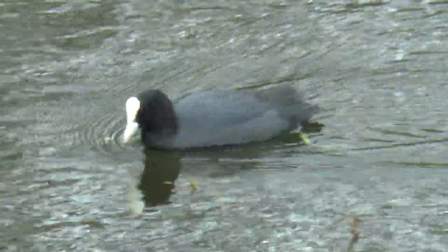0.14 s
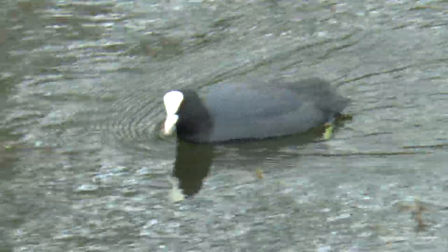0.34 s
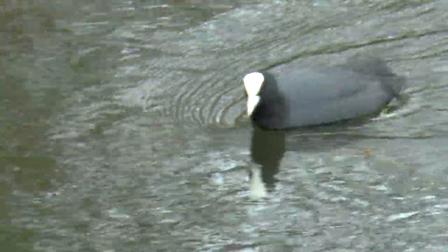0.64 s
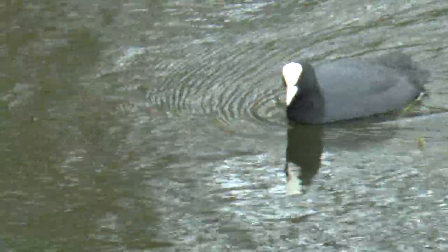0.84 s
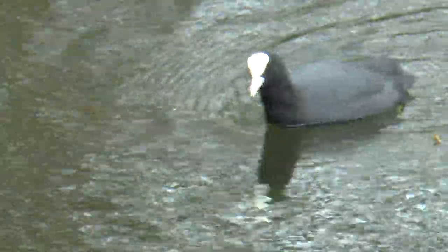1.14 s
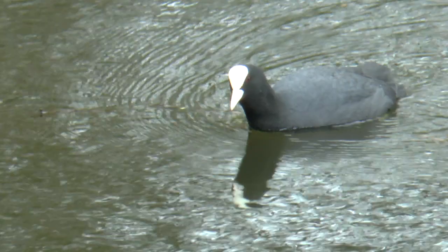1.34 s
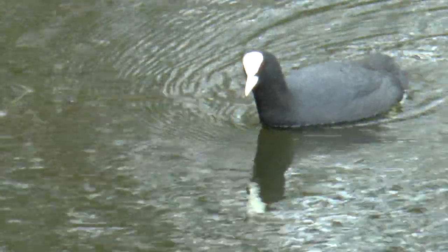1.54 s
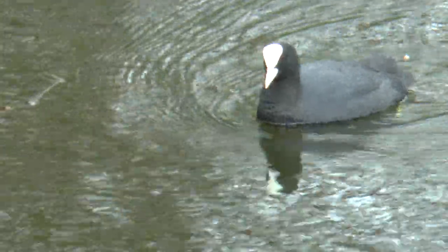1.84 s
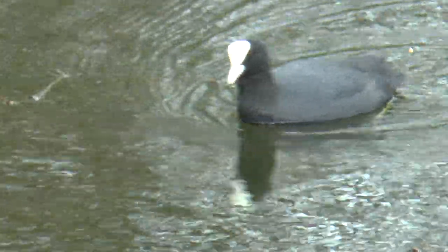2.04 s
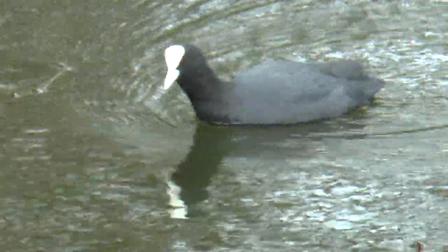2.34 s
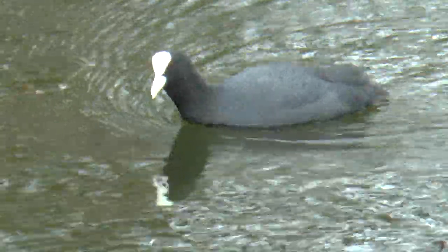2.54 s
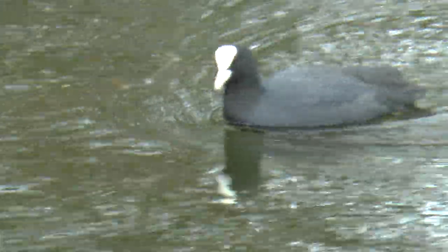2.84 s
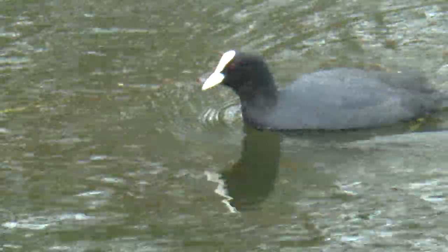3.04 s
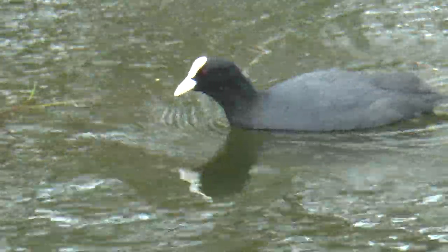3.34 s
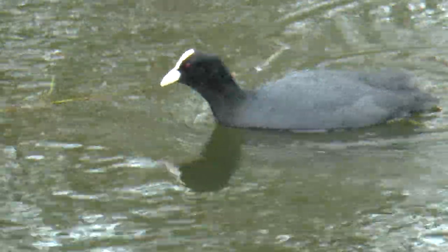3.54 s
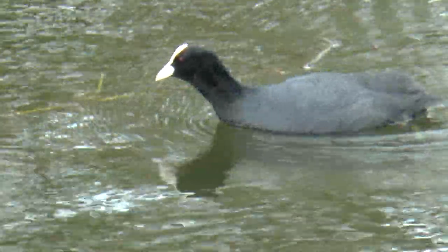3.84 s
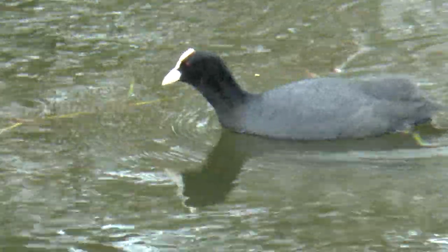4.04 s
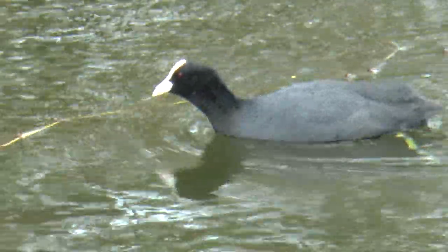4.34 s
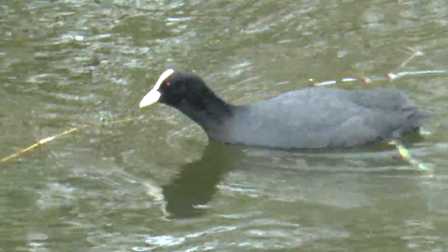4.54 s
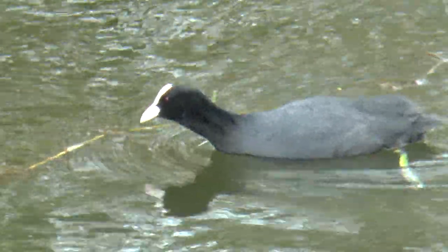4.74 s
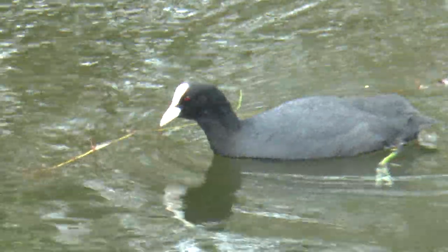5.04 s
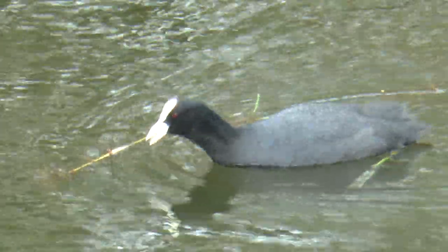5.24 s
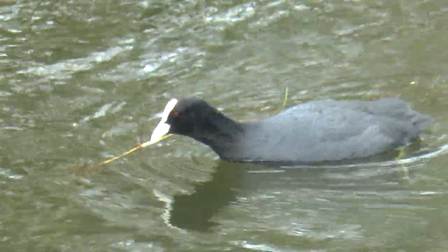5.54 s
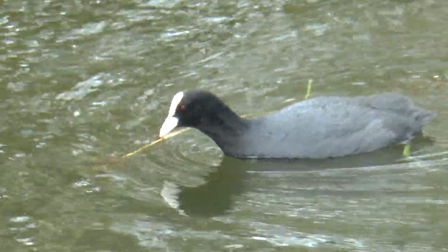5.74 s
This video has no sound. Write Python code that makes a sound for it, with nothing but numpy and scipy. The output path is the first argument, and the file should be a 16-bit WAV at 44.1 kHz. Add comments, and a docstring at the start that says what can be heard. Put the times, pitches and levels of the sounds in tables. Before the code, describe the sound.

Wind buffets the microphone beside a lake as a waterbird repeats brief, clear notes with a light echo.

```python
"""A string of short coot notes on a lake, most kicking up in pitch, all slurring down; the banks echo them.
Each is a nearly pure syrinx tone whose overtones fade first as the pressure drops.
Wind eddies rumble and buffet on the microphone over a low drone, a distant wash and a fine hiss.
Something rustles briefly, a far bird chips twice and tiny splashes tick now and then."""
import sys
import numpy as np
from scipy import signal
from scipy.fft import rfft, irfft
from scipy.io import wavfile
from scipy.ndimage import uniform_filter1d

SR = 44100
rng = np.random.default_rng(int(sys.argv[2]) if len(sys.argv) > 2 else 0)


def materialize(psi):
    """Save the field psi as 16-bit PCM at rate SR to the path in sys.argv[1].

    A 1-D psi becomes a single channel; in a 2-D psi each row is a channel.
    """
    bounded = np.clip(np.atleast_2d(psi).T, -1, 1)
    quanta = np.round(bounded * 32767).astype(np.int16)
    wavfile.write(sys.argv[1], SR, quanta)


N = 259749
TIME = np.arange(N) / SR


def coot():
    """Notes heard straight across the water and back from the banks."""
    # t/s, length/s, start f/Hz, top f/Hz, level/dB, bite near 4 kHz/dB, treble/dB,
    # bill resonance f/Hz, send to banks/dB
    notes = [(-.045, 0.0597, 1336, 1350, -31, 4.5, -7, 8000, 0.5),
             (.538, 0.0818, 1372, 1438, -22.5, 1, -11.5, 8500, -0.5),
             (1.387, 0.0868, 1281, 1336, -22, 0.5, 0, 8020, -0.5),
             (2.622, 0.0756, 1312, 1370, -20, 1.5, 3, 10160, -0.5),
             (3.094, 0.0505, 1310, 1298, -24, -11.5, -16, 7900, 0),
             (3.565, 0.0799, 1335, 1364, -23, -4.5, 0.5, 7940, 2),
             (4.295, 0.0985, 1368, 1370, -17.5, .5, 2.5, 8720, 0.5),
             (5.325, 0.11, 1368, 1369, -17, .5, 3.5, 11380, 0)]
    direct, sent = np.zeros((2, N))
    for start_s, *settings, send_db in notes:
        note = coot_note(*settings)
        add(direct, start_s, note)
        add(sent, start_s, gain_of(send_db) * note)
    return direct + lake_echo(sent)


def coot_note(length_s, start_hz, top_hz, level_db, bite_db, treble_db, bill_hz):
    """Nearly pure syrinx tone, coloured by the throat; the open bill picks out high overtones."""
    # throat response: f/Hz, level/dB
    throat = [(1400, 1.5), (2650, -13.5), (4000, -20.5), (5300, -37), (6700, -47), (8000, -47.5),
              (9400, -45.5), (10900, -49.5), (12300, -49), (15000, -54.5)]
    brightness = [(2700, 0), (4000, bite_db), (5500, bite_db), (8000, treble_db)]
    attack_s, top_s = 0.01425, 0.01598
    fade_db, dulling_db, flutter_db, shimmer_db = 2, 4.5, 0.682, 0.14
    bill_db, bill_width_hz = 10, 1200
    # harder notes slur further and release more slowly
    effort_db = level_db + 23
    end_hz = top_hz * (1 - 0.07687 - 0.0058 * effort_db)
    release_s = length_s * max(0.443 + 0.0517 * effort_db, 0.1)
    t = np.arange(0, length_s, 1 / SR)
    rise = np.clip(t / top_s, 0, 1)
    fall = np.clip((t - top_s) / (length_s - top_s), 0, 1)
    hz = start_hz + (top_hz - start_hz) * rise ** 3 + (end_hz - top_hz) * fall ** 0.743
    jitter = 1 + 0.00615 * waver(326, len(t))
    phase = 2 * np.pi * np.cumsum(hz * jitter) / SR
    onset = np.sin(np.pi / 2 * np.clip(t / attack_s, 0, 1))
    pressure = np.sin(np.pi / 2 * np.clip((length_s - t) / release_s, 0, 1))
    rasp = noise([(800, -31)] + throat[1:])[:len(t)]
    voice = gain_of(-42) * pressure * rasp
    for k in range(1, 12):
        # higher overtones: less steady, later in, sooner out
        unsteady_db = (k - 1) * (flutter_db * waver(120, len(t)) - dulling_db * fall ** 1.37)
        envelope = onset ** (0.2 * (k - 1)) * pressure ** np.sqrt(k)
        ring_db = bill_db * np.exp(-((k * hz - bill_hz) / bill_width_hz) ** 2)
        partial_db = at_hz(throat, k * hz) + at_hz(brightness, k * hz) + ring_db + unsteady_db
        voice += gain_of(partial_db) * envelope * np.sqrt(2) * np.cos(k * phase)
    contour_db = level_db - fade_db * fall + shimmer_db * waver(150, len(t))
    return voice * onset ** 0.99 * gain_of(contour_db)


def lake_echo(dry, tail_db=-16, build_s=0.019, near_db=6, near_s=0.029, taps_per_s=2000):
    """A few clear reflections and a scattered tail, strongest at first from the near bank."""
    # first reflections off water and banks: delay/s, level/dB
    echoes = [(.038, -20), (.058, -25.5), (.095, -24.5), (.123, -28)]
    # decay of the banks' ring: f/Hz, t60/s
    bank_t60 = [(1300, 0.674), (2700, 0.46), (4000, 0.47), (8000, .28), (14000, .15)]
    # scattered spectrum: f/Hz, level/dB
    scatter = [(1300, -1.5), (2700, 3.5), (4000, 10), (5500, 12.5), (8500, 14.5), (12000, -6.5)]
    t = np.arange(SR) / SR
    swell = (1 - np.exp(-t / build_s)) * gain_of(near_db * np.exp(-(t / near_s) ** 2))
    taps = rng.choice([-1., 1.], SR) * (rng.random(SR) < taps_per_s / SR) * swell
    hz, frame_s, frames = signal.stft(taps, SR, nperseg=256)
    decay_db = 60 * frame_s / at_hz(bank_t60, hz)[:, None]
    frames = frames * gain_of(at_hz(scatter, hz)[:, None] - decay_db)
    tail = signal.istft(frames, SR, nperseg=256)[1][:SR]
    voice_band = abs(rfft(tail))[1200:1450]  # 1 Hz bins around the coot's pitch
    response = gain_of(tail_db) * tail / np.sqrt(np.mean(voice_band ** 2))
    for delay_s, echo_db in echoes:
        add(response, delay_s, gain_of([echo_db]))
    return signal.fftconvolve(dry, response)[:N]


def wind(trim_db=0.5, churn_db=1.6, churn_hz=9, buffet_s=0.0307, tilt_db_per_oct=1.0, pivot_hz=36):
    """Eddies at the microphone: rumble rides the gusts; a buffet is a short push of faster eddies."""
    # gust strength: t/s, level/dB
    gusts = [(.02, -12.5), (.45, -14.5), (.7, -25), (.84, -13.5), (1.27, -15.5), (1.6, -22.5), (1.92, -17),
             (2.17, -24.5), (2.8, -19), (3.02, -23), (3.55, -13.5), (3.73, -20.5), (4.4, -20.5),
             (4.66, -15.5), (4.88, -27), (5.25, -22), (5.4, -25.5), (5.78, -14)]
    # thumps on the microphone: peak t/s, level/dB
    buffets = [(1.725, -12), (2.05, -12.5), (2.265, -15), (2.49, -14), (2.66, -13.5), (3.325, -12.5),
               (4.65, -15.5), (4.97, -17)]
    # rumble spectrum: f/Hz, density/dB
    slow = [(3, -16), (10, -1), (22, -1), (36, 3), (60, -6), (95, -12), (125, -21.5), (170, -27),
            (250, -38.5), (500, -53.5), (1500, -90.5)]
    fast = [(hz, db + tilt_db_per_oct * np.log2(hz / pivot_hz)) for hz, db in slow]
    gust_db, = over_time(gusts)
    pushes = sum(gain_of(db) * np.exp(-((TIME - peak_s) / buffet_s) ** 2) for peak_s, db in buffets)
    rumble = eddies(slow) * gain_of(gust_db + trim_db + churn_db * waver(churn_hz))
    return rumble + eddies(fast) * pushes


def eddies(spectrum, steadiness=0.72):
    """Turbulent noise, its own level swings partly evened out."""
    flow = noise(spectrum)
    power = uniform_filter1d(flow ** 2, size=2600)
    return unit_rms(flow / power ** (steadiness / 2))


def far_bird(send_db=6):
    """Short, rough, falling chips, heard mostly by way of the banks."""
    # t/s, length/s, start f/Hz, end f/Hz, level/dB, pitch roughness/fraction
    chips = [(2.154, 0.0448, 2590, 2405, -43, 0.04), (5.195, 0.039, 2840, 2140, -44.5, 0.07),
             (5.222, 0.031, 2658, 2106, -46, 0.1)]
    direct = np.zeros(N)
    for start_s, length_s, start_hz, end_hz, level_db, roughness in chips:
        size = round(length_s * SR)
        hz = np.linspace(start_hz, end_hz, size) * (1 + roughness * waver(850, size))
        tone = 2 * np.sin(2 * np.pi * np.cumsum(hz) / SR)
        add(direct, start_s, gain_of(level_db) * np.hanning(size) * tone)
    return direct + gain_of(send_db) * lake_echo(direct)


def water_ticks(skirt_db=-28):
    """Tiny splashes: puffs of bright noise that die at once."""
    # t/s, level/dB, centre f/Hz, t60/s
    splashes = [(2.144, -59, 9000, 0.1), (2.313, -52, 13100, 0.094), (2.439, -50, 7000, 0.039),
                (3.456, -52.5, 7950, 0.036), (4.505, -58, 13100, .043), (4.537, -58, 13000, .05),
                (5.104, -44.5, 5800, 0.0244), (5.760, -48, 7030, 0.01)]
    ticks = np.zeros(N)
    for start_s, level_db, hz, t60_s in splashes:
        t = np.arange(0, t60_s, 1 / SR)
        puff = noise([(hz / 4, skirt_db), (hz, 0), (hz * 4, skirt_db)])[:len(t)]
        add(ticks, start_s, gain_of(level_db - 60 * t / t60_s) * puff)
    return ticks


def rustle(peak_s=0.784, half_length_s=0.072, level_db=-52):
    """One soft swell of bright noise."""
    # f/Hz, density/dB
    spectrum = [(1000, -14), (2700, -8), (3700, 0.5), (4600, -13.5), (9000, -28.5)]
    swell = np.exp(-((TIME - peak_s) / half_length_s) ** 2)
    return noise(spectrum) * gain_of(level_db) * swell


def surroundings(throb_db=2, throb_hz=6, flicker_db=2.28, flicker_hz=40):
    """Throbbing low drone, dull distant wash and fine, flickering hiss."""
    # t/s, drone level/dB
    drone_levels = [(.05, -37.5), (.6, -41), (1.6, -40.5), (2.5, -31), (2.75, -39.5), (3.05, -35.5),
                    (3.7, -39.5), (5.85, -37.5)]
    # t/s, wash level/dB, hiss level/dB
    air_levels = [(0.06, -44, -64.5), (0.14, -47.5, -67), (0.52, -46, -64), (0.73, -40, -58.5),
                  (0.91, -42.5, -62.5), (0.93, -48, -65.5), (1.12, -49.5, -65), (1.25, -43, -62),
                  (1.31, -47.5, -62), (1.65, -39, -56.5), (2.45, -38, -60), (2.63, -38, -58.5),
                  (2.7, -42.5, -62), (3.05, -37.5, -60.5), (3.64, -42.5, -63), (3.74, -40.5, -65),
                  (4.16, -40, -60), (4.83, -41, -63), (5.54, -40.5, -60.5), (5.83, -42, -65)]
    # spectra: f/Hz, density/dB
    drone_spectrum = [(60, -10), (120, -0.5), (170, -1), (240, 0.5), (350, -10.5), (600, -24.5),
                      (1500, -52.5)]
    wash_spectrum = [(60, -13.5), (200, -0.5), (400, 4.5), (700, 0), (1150, -1.5), (1600, -9.5),
                     (2100, -13.5), (2900, -16), (3600, -13.5), (4500, -23.5), (7000, -31.5), (15000, -44)]
    hiss_spectrum = [(1500, -11), (4500, 3.5), (7000, 0), (10000, -3), (15500, -9)]
    drone_db, = over_time(drone_levels)
    wash_db, hiss_db = over_time(air_levels)
    drone = noise(drone_spectrum) * gain_of(drone_db - 0.5 + throb_db * waver(throb_hz))
    wash = noise(wash_spectrum) * gain_of(wash_db + 2)
    hiss = noise(hiss_spectrum) * gain_of(hiss_db - 1.11 + flicker_db * waver(flicker_hz))
    return drone + wash + hiss


def noise(spectrum):
    """Steady unit-rms noise shaped by (f/Hz, density/dB) points."""
    shape = gain_of(at_hz(spectrum, np.fft.rfftfreq(N, 1 / SR)))
    return unit_rms(irfft(rfft(rng.standard_normal(N)) * shape, N))


def waver(rate_hz, size=N):
    """Smooth unit-rms random drift, rolled off above rate_hz."""
    lowpass = np.exp(-(np.fft.rfftfreq(size, 1 / SR) / rate_hz) ** 2)
    return unit_rms(irfft(rfft(rng.standard_normal(size)) * lowpass, size))


def at_hz(points, hz):
    """Interpolate on a log-frequency axis."""
    knots_hz, values = np.transpose(points)
    return np.interp(np.log(hz + 1), np.log(knots_hz + 1), values)


def over_time(rows):
    """Interpolate each column after t/s to every sample."""
    knots_s, *columns = np.transpose(rows)
    return [np.interp(TIME, knots_s, column) for column in columns]


def add(mix, start_s, sound):
    """Mix in at start_s, cropped to fit."""
    start = round(start_s * SR)
    sound = sound[max(-start, 0):]
    part = mix[max(start, 0):][:len(sound)]
    part += sound[:len(part)]


def gain_of(db):
    """dB to amplitude ratio."""
    return 10 ** (np.asarray(db) / 20)


def unit_rms(x):
    """Scale to rms 1."""
    return x / np.sqrt(np.mean(x ** 2) + 1e-20)


def scene():
    """Mono mix of birds, water, surroundings, rustle and wind."""
    return (coot() + far_bird() + water_ticks() + surroundings() + rustle() + wind())[None]


def record(dry):
    """Band limit: steep low-pass."""
    cutoff_hz = 15750
    lowpass = signal.firwin(511, cutoff_hz, window=("kaiser", 9), fs=SR)
    return signal.oaconvolve(dry, lowpass[None], "same")


dry = scene()
out = record(dry)
materialize(out)
```